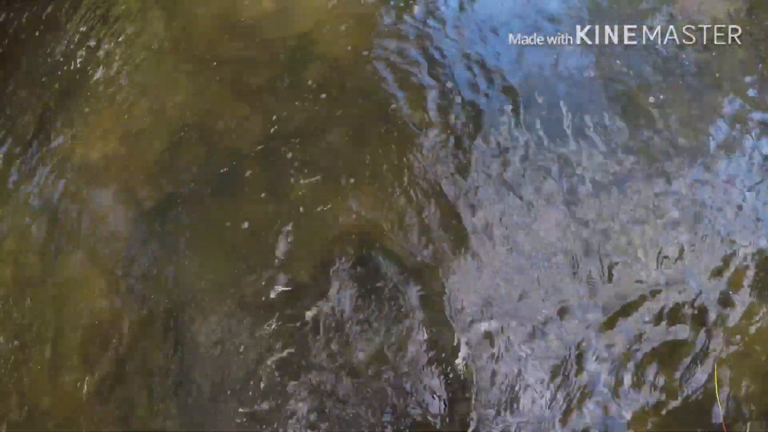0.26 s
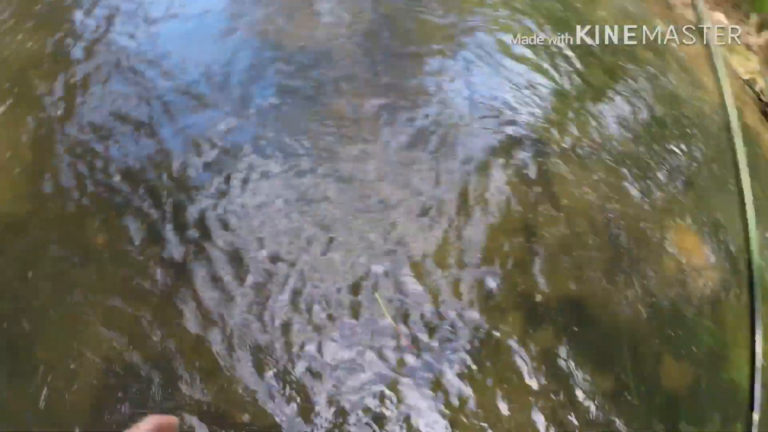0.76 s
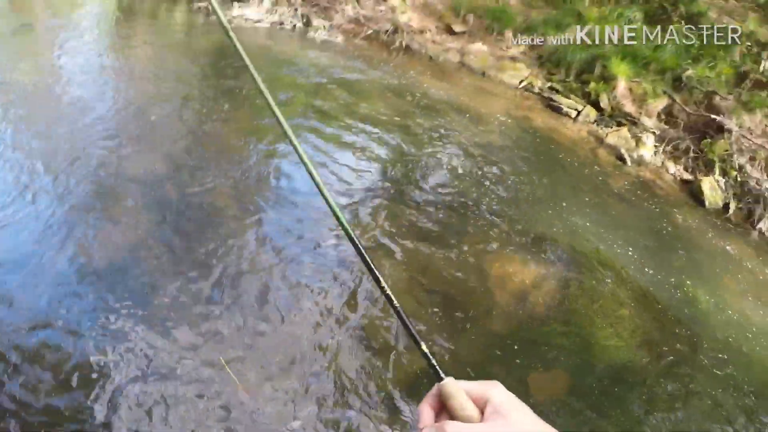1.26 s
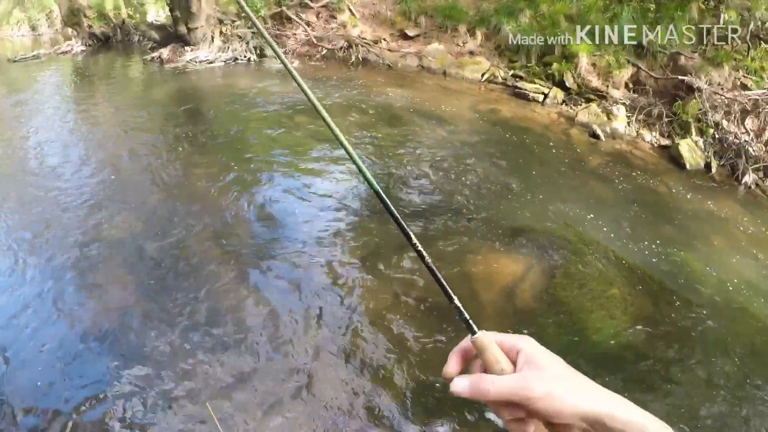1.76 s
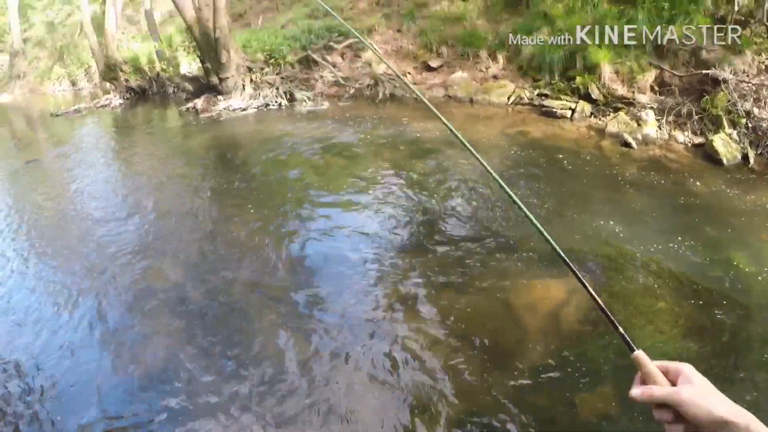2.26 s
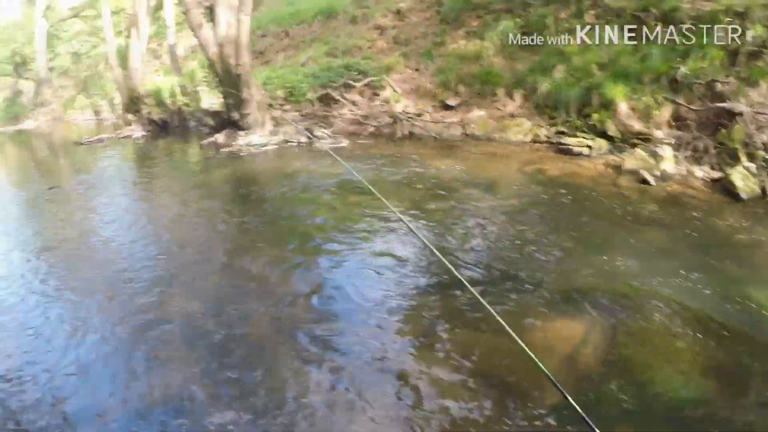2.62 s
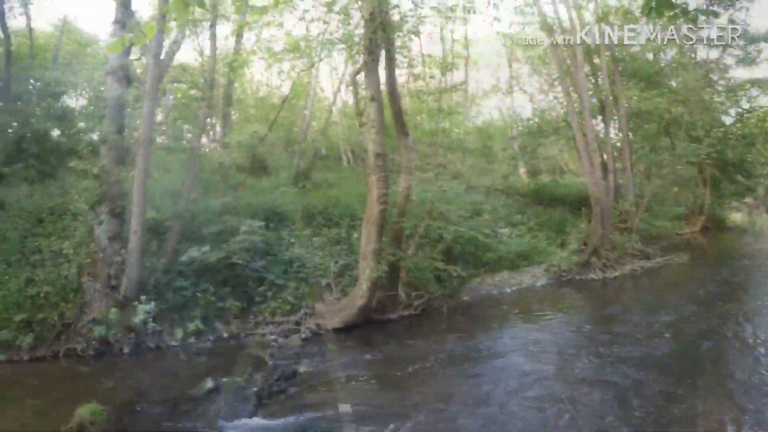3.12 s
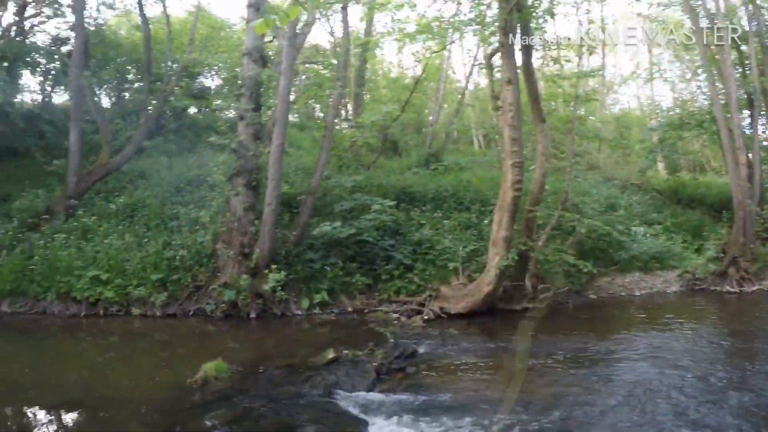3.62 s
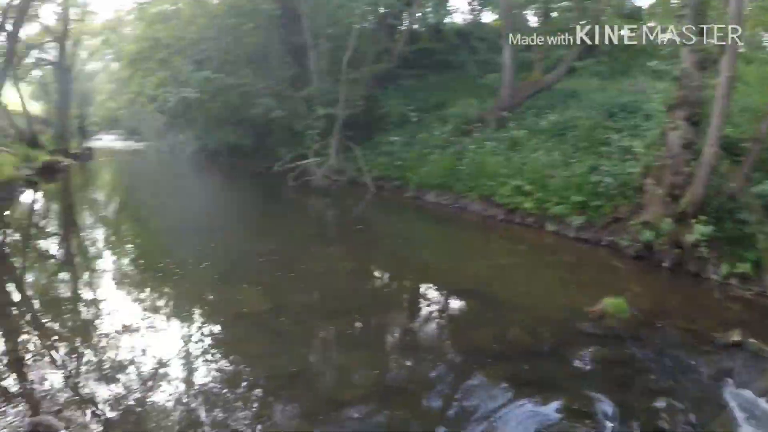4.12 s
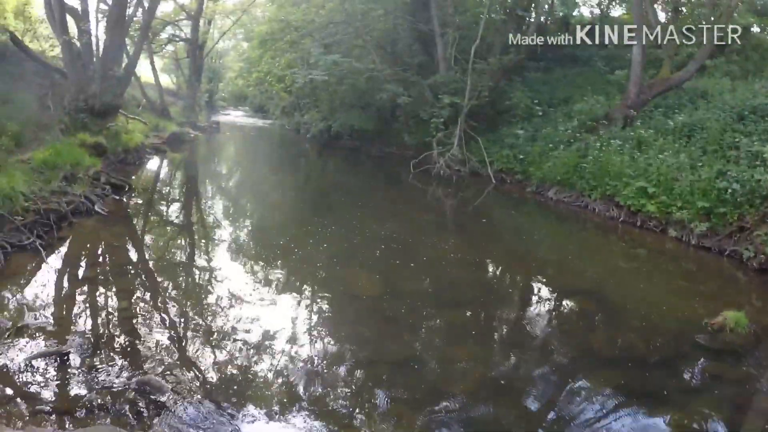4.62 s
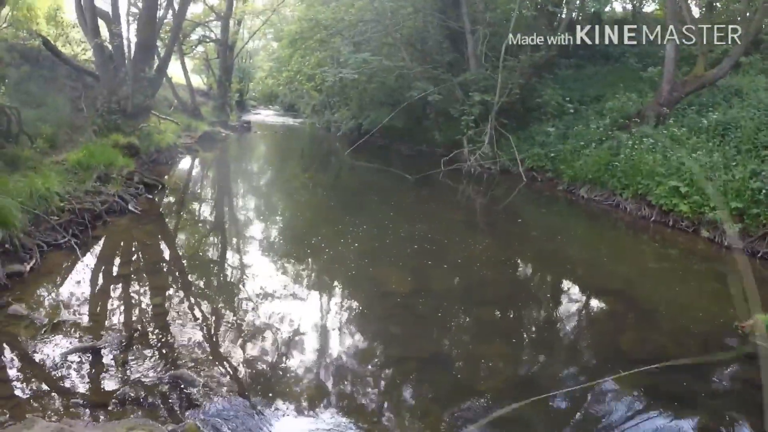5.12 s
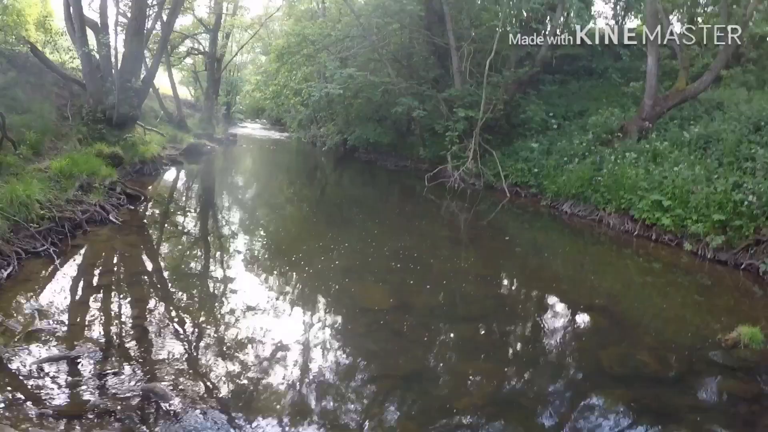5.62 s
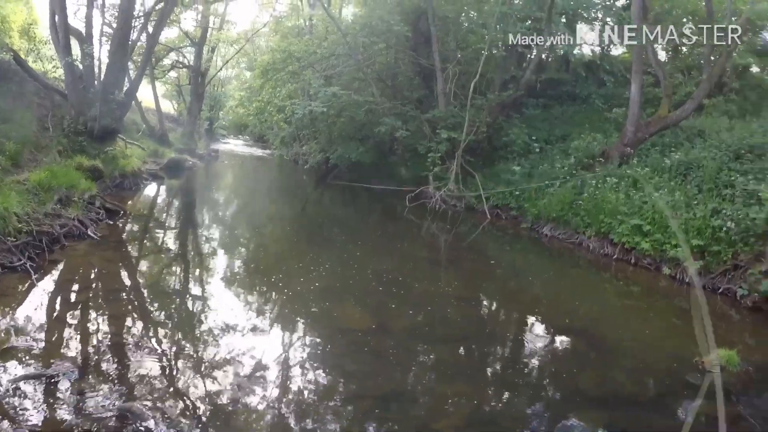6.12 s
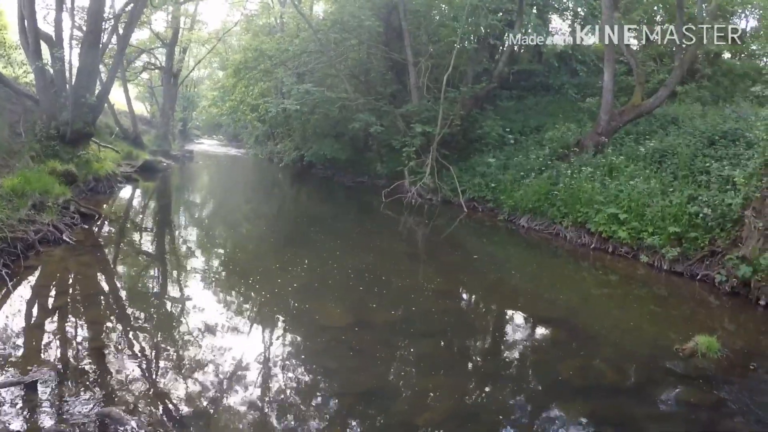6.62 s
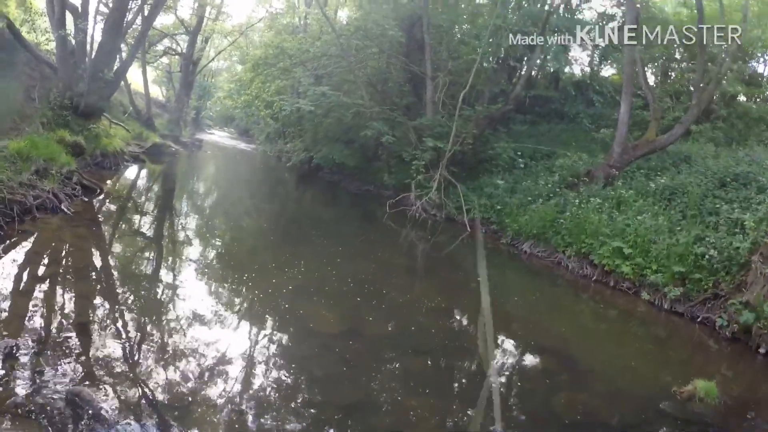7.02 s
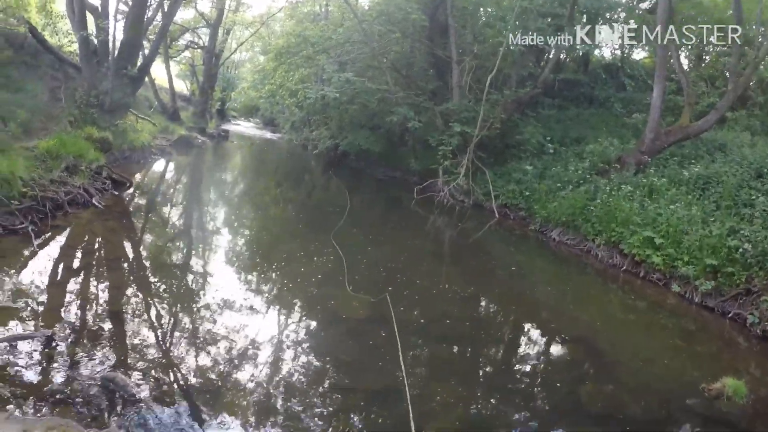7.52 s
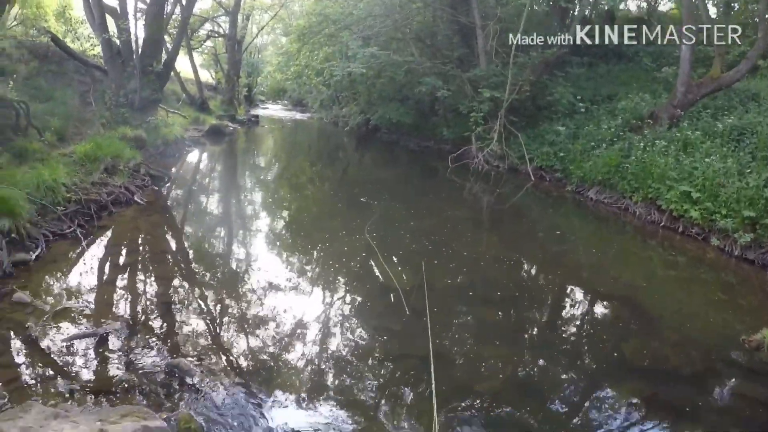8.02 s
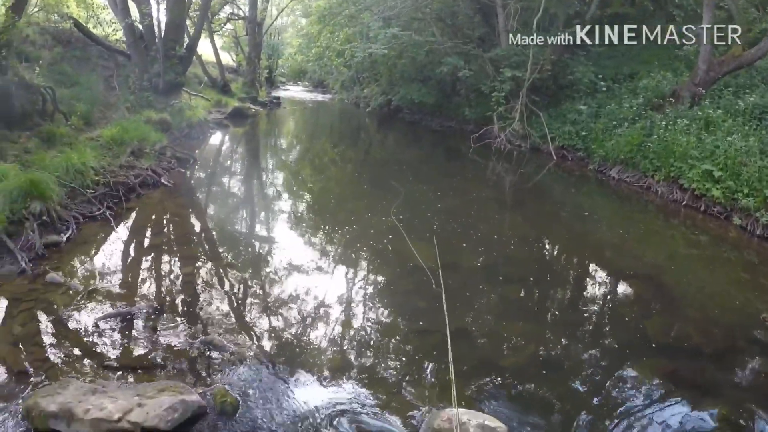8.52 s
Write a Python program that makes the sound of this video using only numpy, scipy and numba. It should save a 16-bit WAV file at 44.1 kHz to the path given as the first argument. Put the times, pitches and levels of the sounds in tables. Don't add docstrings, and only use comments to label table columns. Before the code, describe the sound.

Outdoors by a small river, close water rushes over stones, with low hollow glugs, bubbling and hissing spray. Tiny drips tick near the start, then a bird gives four short, pure whistles. The sound cuts almost to nothing, then a second, fuller and less bright rush rises over about a second and continues with gurgles and deep plops. A camera in a waterproof case muffles everything slightly.

```python
import sys
import numpy as np
from scipy import signal
from scipy.fft import rfft, irfft, next_fast_len
from scipy.io import wavfile
from scipy.ndimage import uniform_filter1d, minimum_filter1d, map_coordinates
from numba import njit

SR = 44100
rng = np.random.default_rng(int(sys.argv[2]) if len(sys.argv) > 2 else 0)


def amplitude_ratio(level_db):
    exponent = np.asarray(level_db, float) / 20
    return 10 ** exponent


def log_audio(samples):
    frames = np.atleast_2d(samples).T
    limited = np.clip(frames, -1, 1)
    pcm = np.round(limited * 32767).astype(np.int16)
    wavfile.write(sys.argv[1], SR, pcm)


N = 386301
CHANGE_S = 2.572

# frequency in Hz, level in dB per Hz.
WATER_TONE = [
    [(105, -61), (130, -17.5), (165, -1.5), (230, 0), (310, -3), (390, -2), (460, -0.8), (540, 0), (660, -4.5), (850, -10), (1200, -18), (1700, -26.5), (2100, -31.5), (2600, -39)],
    [(105, -44), (130, -32.5), (165, -8.5), (230, -4.5), (310, -4), (390, -0.5), (460, 1.5), (540, 0.6), (660, -2), (850, -6.5), (1200, -14), (1700, -20.5), (2100, -26), (2600, -32)],
]
# frequency in Hz, level in dB per Hz.
SPRAY_TONE = [
    [(2200, -29), (2700, -2.5), (3100, -1.5), (3550, 0), (4000, -7.5), (4600, -6.5), (5400, -4.5), (6300, -3), (7600, -1.5), (9000, -7), (10300, -8.5), (11300, -14), (12500, -14), (13400, -19)],
    [(2200, -3), (2700, -11), (3100, -6.5), (3550, -2.5), (4000, -11.5), (4600, -11), (5400, -8.4), (6300, -8.5), (7600, -6.5), (9000, -12), (10300, -14.5), (11300, -20), (12500, -20), (13400, -24.5)],
]
# frequency in Hz, level in dB, phase in rad, likeness 0 to 1.
PORT_LOW = [(105, -1.9, -0.14, 0.39), (130, -4.3, -0.32, 0.86), (165, -4.9, -0.44, 0.99),
            (230, -6.6, -0.58, 0.99), (310, -9.5, -0.86, 0.99), (390, -13.4, -1.39, 0.99),
            (460, -15.0, -2.22, 0.99), (540, -12.0, -2.91, 0.99), (660, -7.8, -3.29, 0.99),
            (850, -3.8, -3.51, 0.98), (1200, -1.7, -3.58, 0.95), (1700, -2.5, -4.07, 0.9),
            (2100, -3.3, -4.6, 0.76), (2600, -0.0, -2.83, 0.15)]
# frequency in Hz, level in dB, phase in rad, likeness 0 to 1.
PORT_HIGH = [(2200, -2.5, 1.68, 0.64), (2700, 1.2, 3.24, 0.38), (3100, -3.8, 2.03, 0.53),
             (3550, -8.5, 1.37, 0.66), (4000, -5.9, -0.68, 0.23), (4600, -2.8, -2.9, 0.24),
             (5400, -5.7, -2.63, 0.42), (6300, -2.6, -2.81, 0.42), (7600, -1.7, -3.55, 0.54),
             (9000, -0.4, -4.6, 0.29), (10300, -0.5, -6.05, 0.46), (11300, -1.4, -6.38, 0.58),
             (12500, -3.6, -6.47, 0.25), (13400, -1.4, -6.35, 0.5)]
# time in seconds, facing from 0 (away) to 1 (toward).
FACING = [
    [(0, 0.21), (.3, 0.058), (.7, 0.24), (1.25, 1.02), (2.56, 1.13)],
    [(2.6, 0.54), (3.3, 0.15), (3.7, 0.58), (4.1, 0.85), (4.9, 0.9), (5.3, 0.87), (6.4, 0.85), (7.4, 1), (8.76, 0.93)],
]
# time in seconds, level in dB.
HEAVES = [
    [(.1, -1), (1.3, -2), (2.1, 2), (4.35, 0.5), (5.6, -2), (7.25, 0.5)],
    [(.3, -0.5), (2.3, -3), (3.05, 2.5), (4.3, 0), (5.25, 3), (5.45, -1), (6.95, 3), (7.6, 1.5), (8.4, 1.5)],
    [(.35, 0.5), (.85, -1.5), (2.1, 0.5), (4, 1.5), (5.5, 0.5), (6.9, 0.5), (7.6, 2.5), (8.6, -3.5)],
]
# time in seconds, change of the spray in dB.
SPLASHES = [(.03, 3.5), (.23, 6), (.45, 3), (.77, -0.5), (3.71, 2.5), (3.93, 3), (4.07, -2.5), (4.16, 2),
            (4.29, 2.5), (4.35, -1.5), (4.48, 2), (4.64, 3.5), (4.77, 2), (4.92, 5), (5.42, -1), (5.88, 4),
            (5.95, -4.5), (6.6, 1), (6.85, 3.5), (6.89, -3), (7.15, 3.5), (7.34, 1.5), (7.63, 0), (7.75, 3),
            (7.89, -0.5), (8.05, 0.5), (8.23, -0.5), (8.42, 0), (8.7, 0)]
# start in seconds, peak level in
# dB, pitch in Hz.
GLUGS = [(3.937, -26.5, 185), (4.408, -38, 201), (4.62, -18.5, 198), (5.046, -18.5, 190), (5.364, -38, 223),
         (6.254, -20.5, 239), (6.468, -18.5, 253), (7.003, -29.5, 193), (7.22, -18, 160), (7.361, -21, 194),
         (8.042, -24, 214), (8.563, -17.5, 232),
         (7.113, -26, 180),
    (7.219, -28, 163),
    (7.29, -27, 166),
    (7.357, -23, 187),
    (7.511, -26.5, 161),
    (7.681, -25.5, 180),
]
# start in seconds, peak level in dB, pitch in Hz.
POCKETS = [(0.02, -31, 243), (0.117, -9.5, 297), (0.378, -3, 470), (0.522, -6, 371), (0.758, -12, 350),
           (0.874, -10, 272), (0.937, -7, 340), (1.016, -15, 484), (1.121, -3, 370), (1.237, -6, 292),
           (1.536, -4, 382), (1.746, -7, 296), (1.982, -12, 328), (2.185, -21, 430), (3.382, -17, 412),
           (3.541, -7, 447), (3.618, -10, 463), (4.373, -2, 393), (4.419, -6.5, 424), (4.617, -12, 415),
           (4.948, -4, 299), (5.21, -16, 331), (5.321, -13, 364), (5.366, -15, 400), (5.59, -13, 357),
           (6.03, -22, 275), (6.121, -7, 413), (6.296, -13, 410), (6.477, -10, 270), (6.556, -16, 474),
           (6.851, -10, 351), (6.899, -7, 321), (6.971, -13, 363), (7.106, -11, 294), (7.343, -15, 420),
           (7.416, -12, 285), (7.564, -12, 462), (7.861, -16, 416), (8.496, -15, 420), (8.587, -9, 305)]
# start in seconds, peak level in dB, pitch in Hz.
GURGLES = [(0.361, -22, 547), (0.851, -17, 496), (0.936, -20, 533), (3.762, -14, 575), (5.256, -5, 579),
           (5.401, -26, 527), (5.609, -14, 580), (5.761, -16, 552), (7.356, -9, 587), (7.419, -21, 605),
           (7.969, -11, 548), (8.377, -10, 548), (8.519, -26, 580)]
# start in seconds, peak level in dB, pitch in Hz.
RIPPLES = [(3.2884, -19, 1030), (3.5453, -31, 1220), (3.7004, -28, 1040), (3.813, -14, 1270),
           (3.867, -28, 1290), (3.9607, -14, 1500), (4.12, -11, 1190), (4.3535, -30, 1630),
           (4.4143, -34, 1180), (4.4557, -20, 1560), (4.68, -25, 1060), (4.8214, -34, 1730),
           (5.0916, -16, 980), (5.332, -20, 1050), (5.8964, -18, 1030), (5.9653, -15, 980),
           (6.0346, -30, 1060), (6.2382, -25, 1070), (6.4192, -21, 1080), (6.58, -27, 1020),
           (7.05, -19, 1340), (7.1486, -20, 1160), (7.364, -31, 990), (7.4525, -18, 1100),
           (7.631, -21, 2050), (8.1109, -27, 1020), (8.1633, -29, 1280)]
# start in seconds, peak level in dB, pitch in Hz.
DRIPS = [
    (.128, -41, 3250),
    (.128, -38, 1860),
    (.147, -47, 3400),
    (.172, -37, 1700),
    (.183, -32, 1900),
    (.225, -42, 2480),
    (.312, -39, 2250),
    (.354, -40, 2250),
    (.445, -46, 4300),
]
# start in seconds, length in seconds, top pitch in Hz, level in dB.
WHISTLES = [
    (1.27, 0.067, 1824, -23.5),
    (1.705, 0.056, 1800, -30),
    (2.04, 0.11, 1812, -24),
    (2.166, 0.48, 1808, -28.5),
]
# time in seconds, peak level in dB, dying time in seconds.
GUSTS = [
    (0, -39, 0.1),
    (.95, -42, 0.75),
]
# frequency in Hz, level in dB per Hz.
RUMBLE = [(15, -32), (40, 9), (90, 6.5), (130, -6), (200, -49)]
# frequency in Hz, level over rounding step in dB.
COARSE = [(60, 45), (200, 28), (500, 20), (850, 7.5), (1200, 5.5), (1700, 5), (2200, 4), (3000, 4),
          (4000, 4), (5200, 3), (9000, 3), (10300, 3.2), (11500, 1.5), (13000, -1.5)]
# from seconds, to seconds, middle in Hz, half width in Hz,
# share 0 to 1.
VALLEYS = [(1.0, 2.57, 2550, 230, .2), (.93, 2.57, 13350, 300, .6), (3.85, 8.76, 13200, 500, .5),
           (-1, .93, 12600, 220, .4), (3.2, 3.9, 12400, 500, .35), (3.7, 8.76, 4550, 380, .14),
           (3.3, 8.76, 2750, 200, .05), (-1, .93, 11800, 900, .25), (2.7, 4.1, 11600, 1300, .25),
           (4.1, 8.76, 11800, 1100, .2), (.93, 2.57, 12000, 1000, .06)]
# from seconds, to seconds, middle in Hz, half width in Hz, share.
HOLES = [(1.1, 1.19, 2590, 50, 1), (1.22, 1.27, 2630, 60, 1), (1.26, 1.3, 2800, 50, 1),
         (1.44, 1.5, 2660, 80, 1), (1.49, 1.61, 2490, 120, 1), (1.56, 1.61, 2680, 110, 1),
         (1.75, 1.82, 2480, 80, 1), (1.89, 1.92, 2600, 70, 1), (1.93, 1.98, 2470, 50, 1),
         (1.98, 2.06, 2600, 40, 1), (2.06, 2.14, 2590, 90, 1), (2.12, 2.19, 2430, 110, 1),
         (2.23, 2.29, 2500, 70, 1), (2.29, 2.35, 2580, 40, 1), (2.38, 2.42, 2450, 60, 1),
         (2.47, 2.5, 2480, 140, 1)]
# from seconds, to seconds.
NARROWED = [
    (-1, .93),
    (2.6, 3.9),
]
# time in seconds, middle in Hz, half width in Hz.
ISLANDS = [(.93, 14250, 100), (.93, 13750, 150), (2.37, 13800, 90), (2.44, 14050, 90), (2.46, 13800, 90),
           (2.55, 13900, 300), (2.86, 13050, 200), (3.57, 13100, 200), (3.71, 13000, 170),
           (3.8, 12950, 120), (4.1, 13900, 350)]


def river():
    away = 1 - facing()
    surge = wobble(13.0)
    crests_db = sum(db * hump(s, rise_s=0.024, fall_s=0.012) for s, db in SPLASHES)
    return churn() + babble(away, crests_db, surge) + spray(away, crests_db, surge)


def churn():
    grains = swarm(count=1200, lo_hz=140, hi_hz=900, cycles=3.5, scatter_db=2.1)
    rush = water(grains, 0.07, 0.2, WATER_TONE, PORT_LOW, 95, 950)
    return heaving(rush) * amplitude_ratio(per_spot((-15.5, -19.5)))


def heaving(rush):
    out = rush
    edges_hz = (60, 240, 400, 2000)
    for rows, lo_hz, hi_hz in zip(HEAVES, edges_hz, edges_hz[1:]):
        gain = amplitude_ratio(sum(db * hump(s, rise_s=0.1, fall_s=0.1) for s, db in rows))
        out = out + (gain - 1) * filtered(rush, lambda hz: band(hz, lo_hz, hi_hz) ** 2)
    return out


def babble(away, crests_db, surge):
    grains = swarm(count=3500, lo_hz=900, hi_hz=2500, cycles=13, scatter_db=2.5)
    rush = water(grains, 0.24, 0.6, WATER_TONE, PORT_LOW, 950, 2450)
    level_db = per_spot((-36, -36)) - 3 * away + 0.55 * crests_db
    return rush * amplitude_ratio(level_db + 0.25 * surge + 0.47 * wobble(15))


def spray(away, crests_db, surge):
    grains = swarm(count=16000, lo_hz=2510, hi_hz=12430, cycles=4.3, scatter_db=8.5)
    hiss = water(grains, 0.29, 0.63, SPRAY_TONE, PORT_HIGH, 2360, 15400)
    level_db = per_spot((-45, -46)) - per_spot((5.5, -0.5)) * away + crests_db
    hiss = hiss * amplitude_ratio(level_db + 0.07 * surge + 0.15 * wobble(25))
    finest = filtered(hiss, lambda hz: band(hz, 8000, 20000))
    finest_db = per_spot((-0.5, 2)) - per_spot((2.5, 9.5)) * away
    return hiss + (amplitude_ratio(finest_db) - 1) * finest


def water(grains, share, patch_db, tones, port_table, lo_hz, hi_hz):
    pair = ports(share * grains + patchy(patch_db), patchy(patch_db), port_table)

    def coloured(tone):
        x = filtered(pair, lambda hz: amplitude_ratio(along(tone, hz)[0]) * band(hz, lo_hz, hi_hz))
        return x / np.std(x.mean(axis=0))
    return per_spot([coloured(tone) for tone in tones])


def swarm(count, lo_hz, hi_hz, cycles, scatter_db):
    draw = rng.random((count, 3))
    hz = lo_hz * (hi_hz / lo_hz) ** draw[:, 1]
    size = hz * amplitude_ratio(-scatter_db * np.log(draw[:, 2] + 0.01))
    return unit(bubbles(draw[:, 0] * N / SR, size, hz, cycles, rise=0.1885))


def bubbles(s, size, hz, cycles, rise):
    t = np.arange(int(SR * 4 * cycles / np.min(hz))) / SR
    age = t * hz[:, None] / cycles
    swell = np.exp(-age) * (1 - np.exp(-8 * age))
    tones = size[:, None] * swell * np.sin(2 * np.pi * cycles * (age + rise * age ** 2 / 2))
    at = np.round(s * SR).astype(int)[:, None] + np.arange(len(t))
    return np.bincount(at.ravel(), tones.ravel(), N + len(t))[:N]


def plops():
    def ring(rows, lift_db, cycles, rise):
        s, db, hz = np.transpose(rows)
        return bubbles(s, amplitude_ratio(db + lift_db), hz, cycles, rise)
    glugs = ring(GLUGS, 12, cycles=4.4, rise=0.021)
    glugs = glugs + ring(RIPPLES, 0.5, cycles=6, rise=0.04)
    glugs = glugs + ring(GURGLES, 3.5, cycles=7.9, rise=0.053)
    glugs = glugs + ring(POCKETS, -2, cycles=6, rise=0.031)
    glugs = filtered(glugs, lambda hz: band(hz, 138, 9000) ** 2)
    drips = ring(DRIPS, 7, cycles=12, rise=0.04)
    return ports(glugs, np.zeros(N), PORT_LOW) + drips


def bird():
    song, t = np.zeros(N), np.arange(N) / SR
    scoop_s, scoop_hz, sag_hz_per_s = 0.11, 42.2, 610
    for s, length, hz, db in WHISTLES:
        age = np.clip(t - s, 0, length)
        scoop = scoop_hz * np.clip(1 - age / scoop_s, 0, 1)
        pitch = hz - scoop - sag_hz_per_s * np.clip(age - scoop_s, 0, None)
        ends = np.clip(np.minimum(age, length - age) / 0.018, 0, 1)
        swell_db = 1.4 * wobble(22.1) + 4.5 * (np.sin(np.pi * (age / length) ** 1.8) - 1)
        song += ends * amplitude_ratio(db + swell_db) * np.sin(2 * np.pi * np.cumsum(pitch) / SR)
    return ports(song, np.zeros(N), [(1800, -1.5, -3.8, 1)])


def wind():
    pair = ports(patchy(1.5), patchy(1.5), [(30, -4, 0, 0.92)])
    gusts = sum(amplitude_ratio(db) * hump(s, 0.42, dying_s) for s, db, dying_s in GUSTS)
    strength = per_spot((gusts, 0)) + amplitude_ratio(-78)
    strength = strength * amplitude_ratio(0.6 * wobble(6.2))
    return strength * unit(filtered(pair, lambda hz: amplitude_ratio(along(RUMBLE, hz)[0])))


def ports(shared, stray, table):
    def left(hz):
        db, phase, alike = along(table, hz)
        alike = np.clip(alike, 0, 1)
        return amplitude_ratio(db) * np.array([alike * np.exp(1j * phase), np.sqrt(1 - alike ** 2)])
    return np.array([filtered(np.array([shared, stray]), left).sum(axis=0), shared])


def patchy(depth_db):
    z = signal.stft(rng.standard_normal(N), nperseg=512)[2]
    field = uniform_filter1d(rng.standard_normal(z.shape), size=6, axis=0)
    field = uniform_filter1d(field, size=10, axis=1)
    return unit(signal.istft(z * amplitude_ratio(depth_db * unit(field)), nperseg=512)[1][:N])


def facing():
    t = np.arange(N) / SR
    return per_spot([np.interp(t, *np.transpose(rows)) for rows in FACING])


def per_spot(pair):
    return np.where(np.arange(N) < CHANGE_S * SR, *pair)


def hump(s, rise_s, fall_s):
    late = np.arange(N) / SR - s
    return np.exp(np.where(late < 0, late / rise_s, -late / fall_s))


def wobble(rate):
    return map_coordinates(rng.standard_normal(int(N * rate / SR) + 4), [np.arange(N) * rate / SR])


def filtered(x, response):
    m = next_fast_len(N + 8192)
    return irfft(rfft(x, m) * response(np.fft.rfftfreq(m, 1 / SR)), m)[..., :N]


def band(hz, lo_hz, hi_hz):
    return 1 / np.sqrt((1 + (lo_hz / (hz + 1)) ** 12) * (1 + (hz / hi_hz) ** 12))


def along(points, hz):
    f, *cols = np.transpose(points)
    return [np.interp(np.log(hz + 1), np.log(f + 1), c) for c in cols]


def unit(x):
    return x / np.sqrt(np.mean(x ** 2) + 1e-20)


def scene():
    return river() + plops() + bird() + wind()


@njit
def follow(peak, attack, release):
    out, held = np.empty_like(peak), 0.
    for i in range(len(peak)):
        held += (peak[i] - held) * (attack if peak[i] > held else release)
        out[i] = held
    return out


def ducked(dry):
    peak = -minimum_filter1d(-np.abs(dry).max(axis=0), size=260)
    held = follow(peak, 1 / (0.0005 * SR), 1 / (0.05 * SR))
    gain = np.maximum(held / amplitude_ratio(-4.5), 1) ** -0.7
    return dry * uniform_filter1d(uniform_filter1d(gain, size=130), size=130)


def patches(shape, size):
    return uniform_filter1d(uniform_filter1d(rng.standard_normal(shape), size=size, axis=2), size=3, axis=1)


def kept_parts(shape, hz, t):
    share = sum(part * (t > a) * (t < b) * np.exp(-((hz - c) / w) ** 4) for a, b, c, w, part in VALLEYS)
    for a, b, c, w, part in HOLES:
        share = share + part * (t > a - 0.01) * (t < b + 0.01) * (abs(hz - c) < w + 15)
    kept = 1 / (1 + np.exp(1.7 * unit(patches(shape, 9)))) > share
    narrow = sum((t > a) * (t < b) for a, b in NARROWED)
    ragged = unit(uniform_filter1d(rng.standard_normal(t.shape), size=2, axis=0))
    edge_hz = np.where(narrow, 12740, 13500) + 25 * ragged
    islands = sum((abs(t - s) < 0.024) * (abs(hz - c) < w) for s, c, w in ISLANDS) > 0
    inside = (hz < edge_hz) | islands
    return np.array([kept[0], kept[1] | (hz < 9000)]) * inside


def starved(x):
    n, lead = 1024, 2048 - 231
    k = np.arange(n) + 0.5
    window = signal.windows.kaiser_bessel_derived(2 * n, 4 * np.pi)[:, None]
    waves = np.cos(np.pi / n * np.outer(np.arange(2 * n) + 0.5 + n / 2, k))
    basis = window * waves * np.sqrt(2 / n)
    pair = np.array([x[0] + x[1], x[0] - x[1]]) / 2
    pair = np.pad(pair, ((0, 0), (lead, 3 * n - (N + lead) % n)))
    blocks = pair.reshape(2, -1, n)
    z = np.concatenate([blocks[:, :-1], blocks[:, 1:]], axis=2) @ basis
    hz = k * SR / (2 * n)
    t = ((np.arange(z.shape[1]) + 1) * n - lead)[:, None] / SR
    power = uniform_filter1d(uniform_filter1d(z ** 2, size=32, axis=2), size=3, axis=1)
    level = np.sqrt(np.abs(power)) + 1e-12
    uneven_db = 2.5 * np.repeat(rng.standard_normal((*z.shape[:2], n // 8)), 8, axis=2)
    step = level * amplitude_ratio(uneven_db - along(COARSE, hz)[0])
    z = np.sign(z) * np.floor(np.abs(z) / step + 0.42) * step
    frames = (z * kept_parts(z.shape, hz, t)) @ basis.T
    joined = (frames[:, 1:, :n] + frames[:, :-1, n:]).reshape(2, -1)
    mid, side = joined[:, lead - n:][:, :N]
    return np.array([mid + side, mid - side])


def fade():
    late = np.arange(N) / SR - CHANGE_S
    closing = np.sin(np.pi / 2 * np.clip(-late / 0.004, 0, 1)) ** 2
    ramp = np.clip((late - 0.048) / 0.9, 0, 1) ** 1.18
    level = per_spot((closing, ramp))
    return level + (0.5 - level) * amplitude_ratio(-25)


def roll_off(x):
    return signal.sosfilt(signal.butter(12, 16000, fs=SR, output="sos"), x)


def record(dry):
    tick = filtered(np.arange(N) == round(CHANGE_S * SR), lambda hz: band(hz, 3000, 15500))
    mix = starved(ducked(dry)) * fade() + amplitude_ratio(-57) * tick
    return roll_off(mix)


dry = scene()
out = record(dry)
log_audio(out)
```